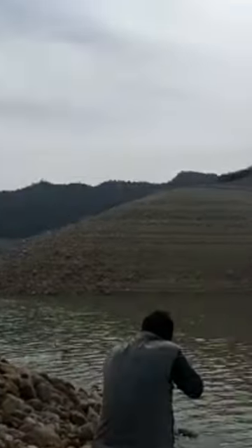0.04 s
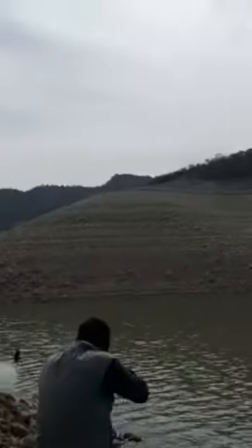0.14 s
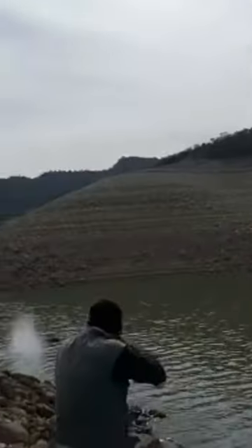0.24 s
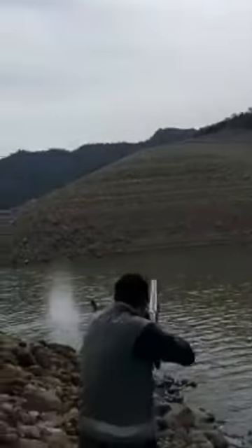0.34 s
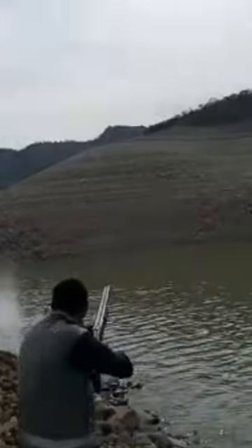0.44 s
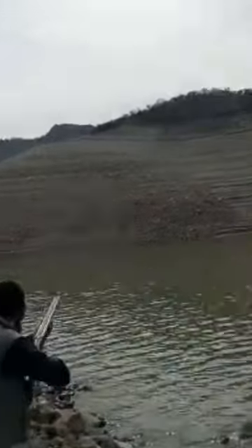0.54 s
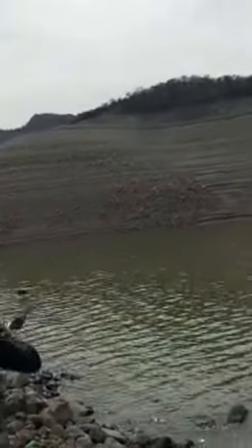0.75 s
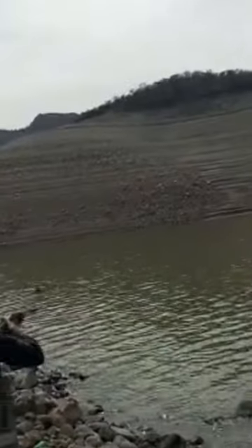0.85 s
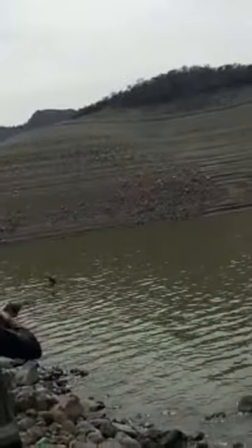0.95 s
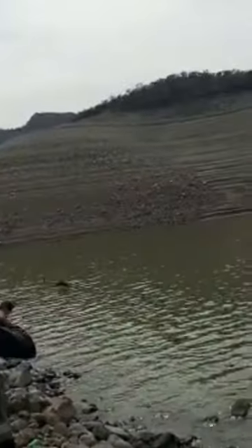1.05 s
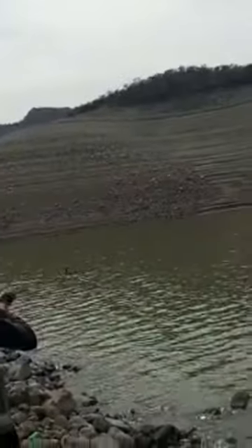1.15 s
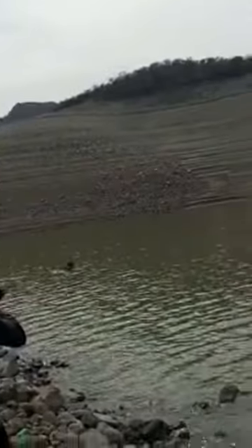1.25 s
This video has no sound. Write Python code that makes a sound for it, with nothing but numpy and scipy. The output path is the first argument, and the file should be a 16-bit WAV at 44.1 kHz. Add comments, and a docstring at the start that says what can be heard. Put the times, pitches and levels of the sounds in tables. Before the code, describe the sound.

A shotgun fires once at about 0.2 seconds, a sharp crack and boom so close it overloads the microphone. Around 0.4 seconds pellets splash into the lake, and fine drops patter back while the bang rolls along the shore. Just after 1 second the hillside across the water returns a duller, thudding echo that fades into a low rumble. A faint breeze and ripples lie underneath.

```python
"""Shotgun over a lake

A shotgun is fired from a stony shore, so close that it overloads the microphone. The pellets
tear into the water and drops fall back while the bang rolls along the shore. Most of a second
later the hillside across the lake returns a duller echo. A breeze and ripples lie underneath."""
import sys
import numpy as np
from scipy import signal
from scipy.fft import rfft, irfft
from scipy.io import wavfile
from scipy.ndimage import uniform_filter1d

SR = 44100
rng = np.random.default_rng(int(sys.argv[2]) if len(sys.argv) > 2 else 0)


def unload_wav(signal):
    """Save mono or channel-first audio to the path in sys.argv[1] as 16-bit WAV at rate SR, clipped to [-1, 1]."""
    wavfile.write(
        sys.argv[1],
        SR,
        np.round(np.clip(np.atleast_2d(signal).T, -1, 1) * 32767).astype(np.int16),
    )


N = 57330
T = np.arange(N) / SR
HZ = np.fft.rfftfreq(N, 1 / SR)
SHOT_S, ECHO_S = 0.2302, 1.056  # when the gun fires and when its main echo starts

# Tables that start with f/Hz set tone, not loudness. A fade is the time taken to drop 60 dB.
# crack of the blast, scattered by nearby stones: f/Hz, level/dB
CRACK_TONE = [(40, -42.5), (200, -4), (800, -6.5), (1500, -0.5), (2250, -3.5), (3300, -1), (4700, 2.5),
              (6400, 2), (8500, -13.5), (13000, -23), (14800, -16)]
# low boom off the ground and water: f/Hz, level/dB
BOOM_TONE = [(25, -27), (55, -43.5), (90, -1), (220, 3.5), (330, -8), (550, -2.5), (900, 1.5), (1400, -12),
             (3000, -37.5), (16000, -69)]
# bark thrown back by the stony bank: f/Hz, level/dB
BARK_TONE = [(40, -26), (200, -14), (450, 0), (650, -4), (920, 6.5), (1300, -8.5), (2200, -20),
             (4500, -11.5), (6400, -11), (8500, -32.5), (15000, -34.5)]
# the bang rolling along the shore: f/Hz, level/dB, fade/s
ROLL_BANDS = [(25, -26.5, 0.57), (60, -17, .5), (90, -5, 0.43), (137, 3, 0.56), (342, 1, 1),
              (750, -0.5, 0.77), (1834, -17, .6), (5500, -16.5, 0.48), (7000, -19.5, 0.49),
              (9000, -33.5, .4), (15000, -36, 0.43)]
# rumble from the far banks: f/Hz, level/dB
RUMBLE_TONE = [(25, -43), (55, -30), (130, 5), (300, -1), (560, 4), (1000, -8), (2300, -28.5),
               (5500, -24.5), (9000, -54.5), (16000, -64.5)]

# pellets striking the water: f/Hz, level/dB
PELLET_TONE = [(40, -42), (300, -3.5), (1200, 3), (2300, -1), (4000, 5), (6400, 6.5), (8500, -11.5),
               (12000, -17.5), (15000, -14)]
# fine spray pattering back down: f/Hz, level/dB
SPRAY_TONE = [(40, -31.5), (1000, -20), (2500, -18), (4600, 4), (6600, -7.5), (8500, -18), (12000, -28),
              (15000, -27)]
# larger splats and falling drops: t/s, level/dB, f/Hz
DROPS = [(.349, -18.5, 5260), (.4037, -12.5, 5000), (0.41, -20, 5250), (0.416, -28, 5140),
         (0.433, -23.5, 4170), (0.4366, -23.5, 4900), (0.4744, -31, 5900), (0.5007, -39.5, 5600),
         (.54, -39.5, 2750), (.571, -41.5, 6000), (0.576, -40, 5400), (0.6105, -38, 4940),
         (.66, -40.5, 4470), (0.695, -42.5, 5500), (0.7588, -46, 5150), (.804, -45, 5940),
         (.858, -41.5, 4900)]
# treble loss shared by all drops: f/Hz, level/dB
DROP_TONE = [(1000, -1.5), (6500, 0.5), (8500, -12.5), (12000, -11.5), (15000, -13)]
# bubbles left by the drops: t/s, level/dB, f/Hz
BUBBLES = [(.583, -37, 3630), (.826, -47, 3550)]

# slaps off bare rock faces: t/s, level/dB, push length/s, treble limit/Hz
ROCK_SLAPS = [(1.0585, -26.5, 0.00012, 2000), (1.063, -20.5, 0.00023, 1800), (1.0648, -12.5, 0.00049, 750),
              (1.0667, -11.5, 0.00074, 700), (1.0736, -10.5, 0.0011, 800), (1.0866, -20, 0.00028, 1200),
              (1.0905, -12, 0.00097, 850), (1.127, -17, 0.0006, 1200)]
# faint early echo from the far waterline: f/Hz, level/dB
WATERLINE_TONE = [(25, -19.5), (100, 1), (450, 2.5), (900, -4.5), (1800, -8.5), (3000, -12), (6300, -11),
                  (9000, -32), (15000, -39)]
# thud of the echo: f/Hz, level/dB
THUD_TONE = [(25, -32), (90, 1), (300, 3.5), (600, 13.5), (1000, -22), (1600, -3), (3000, -40),
             (16000, -58)]
# echo from the rough slope: f/Hz, level/dB, fade/s
SLOPE_BANDS = [(25, -20.5, 0.89), (62, -10, 0.87), (100, 7, 1.37), (206, 3.5, 0.32), (293, 9.5, 1),
               (420, -4.5, 0.78), (760, -1.5, 2.08), (1290, -4.5, 0.87), (2170, -10.5, 1.2),
               (2970, -9, 1.3), (4370, -7.5, 1.16), (6450, -13.5, 0.71), (8320, -33, 0.77),
               (12000, -55.5, 0.59), (16000, -66, 1)]

# breeze and ripples: f/Hz, level/dB
BREEZE_TONE = [(25, -30.5), (55, -12.5), (90, 6), (170, 3.5), (330, -3), (600, -11), (1200, -10),
               (2500, -13), (6300, -11), (8500, -32), (15000, -40)]
# small waves lapping on the stones: t/s, level/dB
LAPS = [(0.027, -51), (0.043, -44), (0.065, -49.5), (0.202, -53)]


def gun():
    """The hammer clicks, then the blast cracks, booms off the ground and barks off the bank."""
    hammer = envelope(SHOT_S - 0.0048, rise_s=0.0005, fade_s=0.022) * noise(CRACK_TONE)
    crack = envelope(SHOT_S, rise_s=0.0005, hold_s=0.027, fade_s=0.071) * noise(CRACK_TONE)
    boom = envelope(SHOT_S, rise_s=0.025, hold_s=0.023, fade_s=0.061) * noise(BOOM_TONE)
    bark = envelope(0.2647, rise_s=0.0079, hold_s=0.015, fade_s=0.022) * noise(BARK_TONE)
    return gain(-30.5) * hammer + gain(-3.5) * crack + gain(-12) * boom + gain(-13) * bark


def shore():
    """The bang rolls along the near shore and lingers as a low rumble from the far banks."""
    roll = reflections(ROLL_BANDS, SHOT_S, rise_s=0.041)
    rumble = envelope(SHOT_S, rise_s=0.47, fade_s=11.6) * noise(RUMBLE_TONE)
    return gain(-21.5) * roll + gain(-45.5) * rumble


def splash():
    """The cloud of pellets hits the water in a swell of tiny snaps; spray and drops fall back."""
    first_hit_s, onset_s, peak_s = 0.345, 0.0027, 0.3767
    rise_db_per_s, fall_db_per_s = 387, 403
    swell_db = np.minimum((T - peak_s) * rise_db_per_s, (peak_s - T) * fall_db_per_s)
    arrived = np.clip((T - first_hit_s) / onset_s, 0, 1)
    pellets = arrived * gain(swell_db) * patter(PELLET_TONE, hits_per_s=10000)
    spray = envelope(0.49, rise_s=0.019, fade_s=1) * patter(SPRAY_TONE, hits_per_s=4300)
    drops = sum(drop(*row) for row in DROPS)
    bubbles = sum(bubble(*row) for row in BUBBLES)
    return gain(-16) * pellets + gain(-49.5) * spray + drops + bubbles


def drop(start_s, db, hz):
    """A stray pellet or a drop hits the water: a short, bright spit of noise around one pitch."""
    width_octaves, floor_db = 0.92, -29
    octaves_away = np.log2((HZ + 1) / hz)
    hump = np.exp(-0.5 * (octaves_away / width_octaves) ** 2)
    tone_db = floor_db * (1 - hump) + look_up(DROP_TONE, HZ)
    spit = shape_tone(rng.standard_normal(N), tone_db)
    return gain(db) * envelope(start_s, rise_s=0.00057, fade_s=0.013) * spit


def bubble(start_s, db, hz):
    """A trapped air bubble rings briefly, its pitch creeping up."""
    glide_per_s = 4.2  # in multiples of the starting pitch
    age = np.maximum(T - start_s, 0)
    ring = np.sin(2 * np.pi * hz * age * (1 + glide_per_s * age / 2))
    return gain(db) * envelope(start_s, rise_s=0.0012, fade_s=0.021) * ring


def hillside():
    """The far side echoes the shot: a faint lead-in, slaps, a thud and a long tail off the slope."""
    lead_in = envelope(0.911, rise_s=0.094, fade_s=0.74) * noise(WATERLINE_TONE)
    slaps = sum(rock_slap(*row) for row in ROCK_SLAPS)
    thud = envelope(ECHO_S, rise_s=0.0048, hold_s=0.034, fade_s=0.11) * noise(THUD_TONE)
    slope = reflections(SLOPE_BANDS, ECHO_S, rise_s=0.017)
    return gain(-47) * lead_in + slaps + gain(-23) * (thud + slope)


def rock_slap(start_s, db, push_s, top_hz):
    """Rock returns the blast wave, a push and a longer pull, rounded by its trip over the lake."""
    bottom_hz = 324
    progress = np.maximum(T - start_s, 0) / push_s
    wave = (T >= start_s) * (1 - progress) * np.exp(-progress)
    band = signal.butter(2, [bottom_hz, top_hz], "band", fs=SR, output="sos")
    rounded = signal.sosfilt(band, wave)
    return -gain(db) * rounded / abs(rounded).max()


def lake():
    """A faint, wavering breeze and ripples, with a few small waves lapping on the stones."""
    breeze_db, waver_db = -55.5, 3.07
    waver = normalise(uniform_filter1d(rng.standard_normal(N), size=3000, mode="wrap"))
    laps = sum(gain(db) * envelope(start_s, rise_s=0.0036, fade_s=0.026) for start_s, db in LAPS)
    return (gain(breeze_db + waver_db * waver) + laps) * noise(BREEZE_TONE)


def reflections(bands, start_s, rise_s):
    """Countless echoes blur into noise in which each frequency band fades at its own speed."""
    hz, times, spectrum = signal.stft(noise(bands), SR, nperseg=512)
    age = np.maximum(times - start_s - rise_s, 0)
    fade_s = look_up(bands, hz, column=2)[:, None]
    tail = signal.istft(spectrum * gain(-60 * age / fade_s), SR)[1][:N]
    return tail * np.clip((T - start_s) / rise_s, 0, 1)


def patter(tone, hits_per_s):
    """Tiny impacts of slightly unequal size land at random moments."""
    size_db = 0.5 * np.minimum(rng.exponential(1, N), 3)
    signs = rng.choice([-1, 1], N)
    hits = rng.random(N) < hits_per_s / SR
    return shape_tone(gain(size_db) * signs * hits, look_up(tone, HZ))


def noise(tone):
    """Steady noise with the tone given by a table."""
    return shape_tone(rng.standard_normal(N), look_up(tone, HZ))


def envelope(start_s, rise_s, fade_s, hold_s=0):
    """Loudness over time: climb in a straight line, hold, then lose 60 dB every fade_s."""
    age = T - start_s
    fading_for = np.maximum(age - rise_s - hold_s, 0)
    return np.clip(age / rise_s, 0, 1) * gain(-60 * fading_for / fade_s)


def shape_tone(sound, db):
    """Turn each frequency up or down by its value in db, then normalise the result."""
    cepstrum = irfft(np.log(gain(db)), N)
    # Folding the second half onto the first makes the filter ring after a click, never before.
    cepstrum[1:N // 2] *= 2
    cepstrum[N // 2 + 1:] = 0
    response = np.exp(rfft(cepstrum))
    return normalise(irfft(rfft(sound) * response, N))


def look_up(table, hz, column=1):
    """Read a table at any frequency, joining its rows with straight lines on a pitch scale."""
    table = np.array(table)
    return np.interp(np.log(hz + 1), np.log(table[:, 0]), table[:, column])


def normalise(sound):
    """Scale a signal so that its average strength (root mean square) is one."""
    return sound / np.sqrt(np.mean(sound ** 2) + 1e-20)


def gain(db):
    """Turn decibels into a number to multiply by."""
    return 10 ** (np.asarray(db) / 20)


def scene():
    """Everything that reaches the microphone, in one channel."""
    return (gun() + shore() + splash() + hillside() + lake())[None]


def record(dry):
    """The blast overloads the microphone, which squashes the peaks; the highest treble is cut."""
    ceiling, hardness, top_hz = 0.97, 3, 15700
    squashed = dry / (1 + abs(dry / ceiling) ** hardness) ** (1 / hardness)
    treble_cut = signal.firwin(511, top_hz, window=("kaiser", 8), fs=SR)
    return signal.oaconvolve(squashed, treble_cut[None], "same")


dry = scene()
out = record(dry)
unload_wav(out)
```